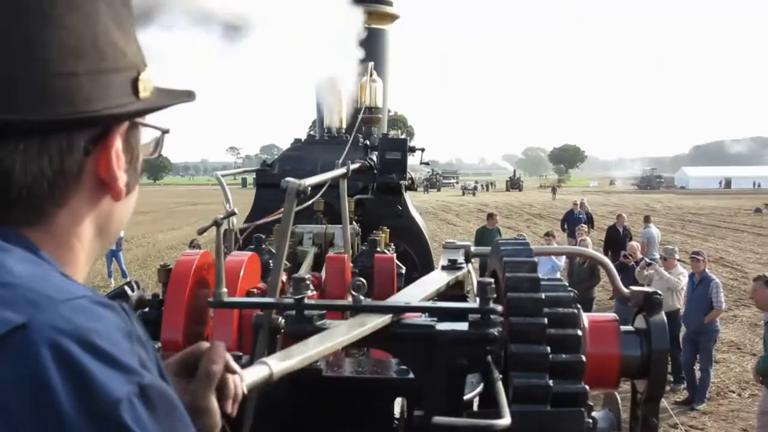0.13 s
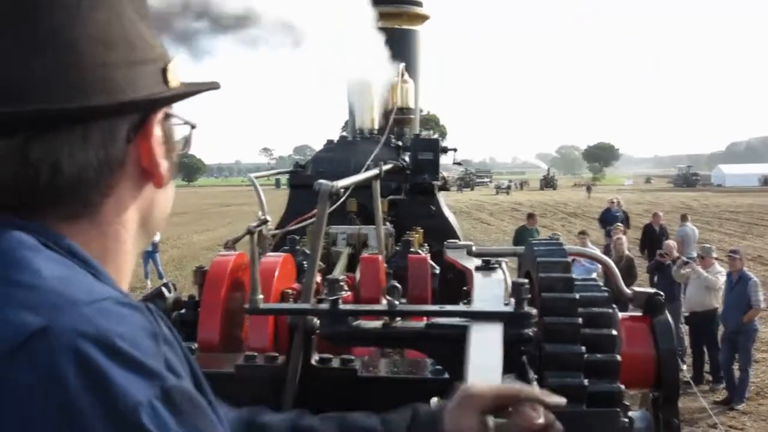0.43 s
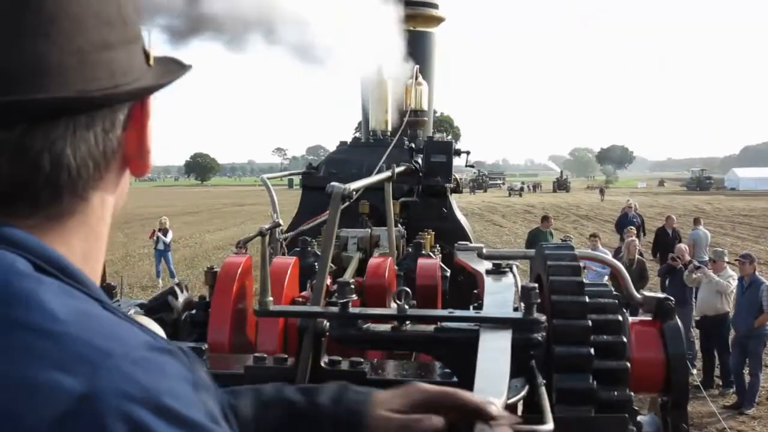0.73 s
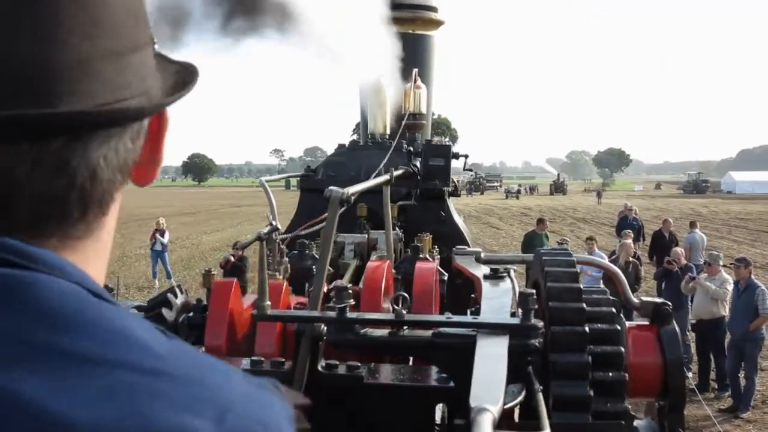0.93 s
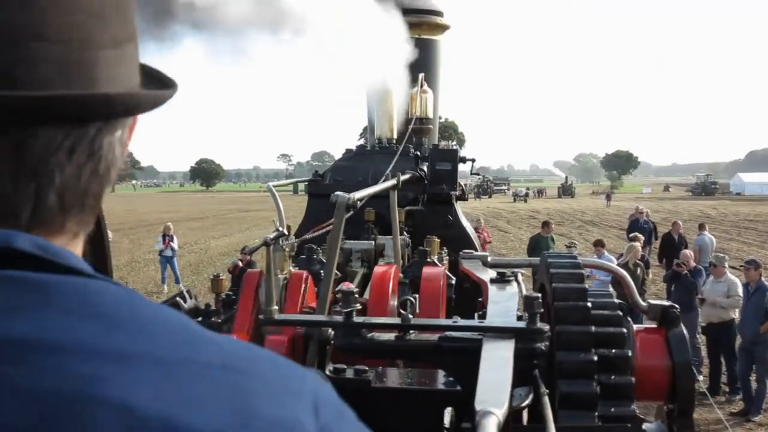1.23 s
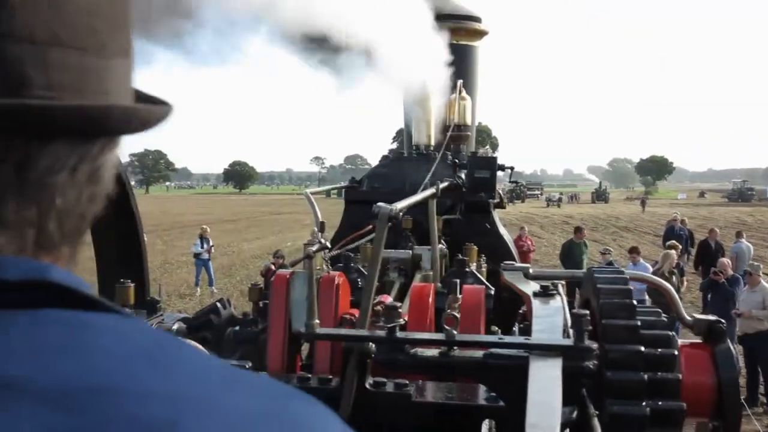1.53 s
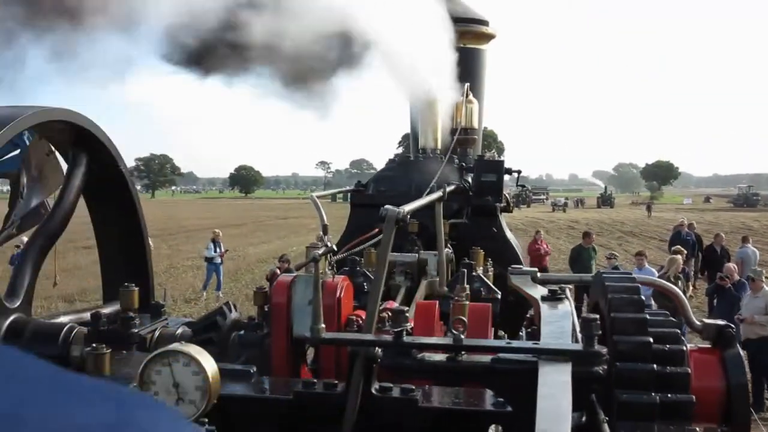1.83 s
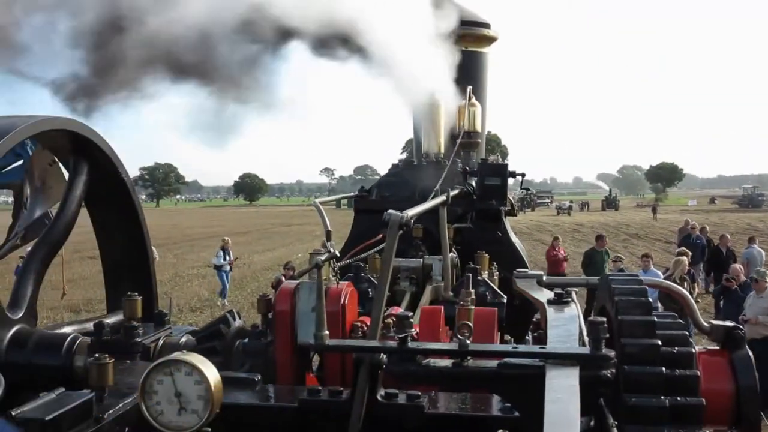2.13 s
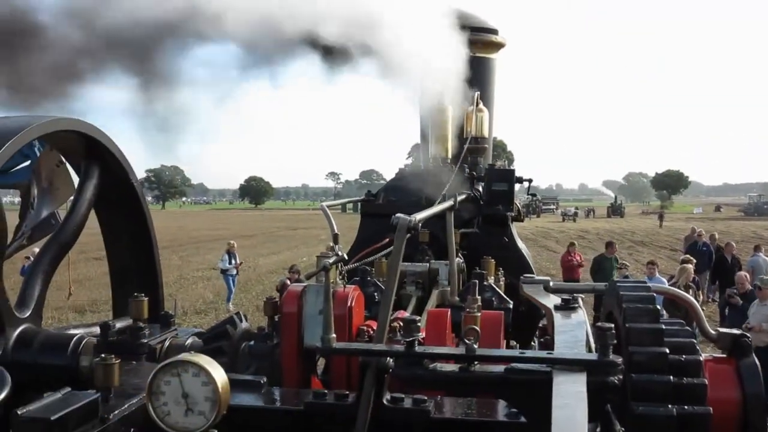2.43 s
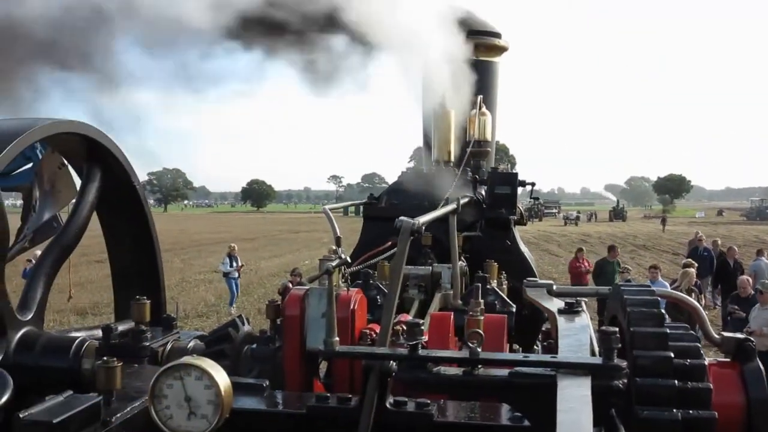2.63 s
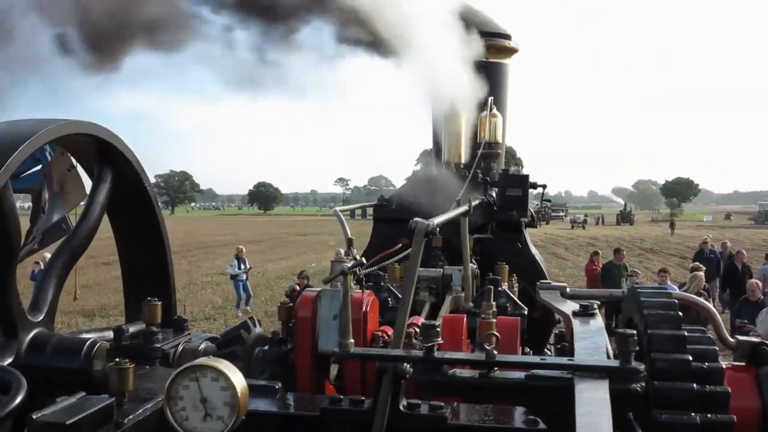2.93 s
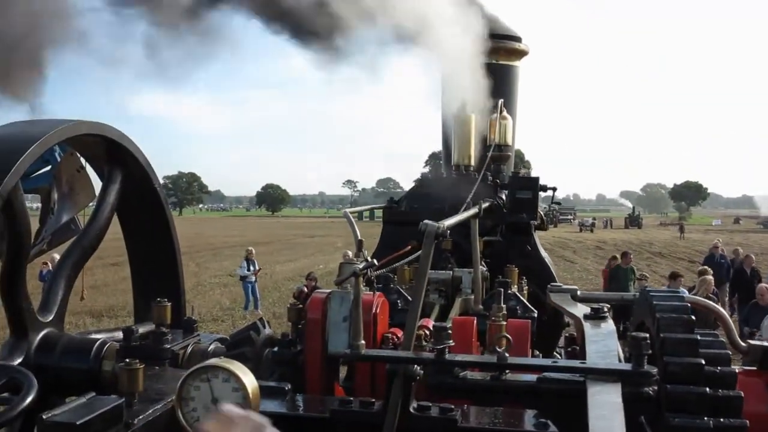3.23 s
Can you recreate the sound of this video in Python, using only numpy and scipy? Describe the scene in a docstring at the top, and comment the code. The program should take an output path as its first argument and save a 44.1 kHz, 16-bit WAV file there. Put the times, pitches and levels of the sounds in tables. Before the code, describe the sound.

Steam hisses steadily from a steam engine while a steel lever clanks and clicks.

```python
"""In a field, a steam engine blows off through its safety valve: a bright jet hiss, combed by echoes off
nearby metal that shift as the hand-held microphone turns. One narrow peak of the hiss glides down.
A long steel lever clanks and rattles and a catch clicks, each blow a crack plus ringing modes.
The boiler rumbles underneath; wind buffets the microphone, popping mostly on the right port."""
import sys
import numpy as np
from scipy import signal
from scipy.fft import rfft, irfft, next_fast_len
from scipy.io import wavfile
from scipy.ndimage import uniform_filter1d, map_coordinates

SR = 44100
rng = np.random.default_rng(int(sys.argv[2]) if len(sys.argv) > 2 else 0)


def dump(signal):
    """Clip the signal to [-1, 1] and save it as 16-bit WAV at the path in sys.argv[1]."""
    limited = np.clip(np.atleast_2d(signal).T, -1, 1)
    pcm = np.round(limited * 32767).astype(np.int16)
    wavfile.write(sys.argv[1], SR, pcm)


N = 149499

# Jet spectrum: freq_hz, left_db, right_db
JET_SPECTRUM = [(1350, -24.5, -23), (1980, -20, -20.5), (3150, -16, -16), (3930, -16.5, -15),
                (5340, -10.5, -8.5), (6950, -10.5, -2.5), (7700, -11.5, -2), (8060, -10, -3),
                (9330, -5, -9.5), (10640, -5.5, -19.5), (11660, -8, -18.5), (13300, -20, -32),
                (14100, -21, -29.5)]
# Narrow peaks and hollows: centre_hz, width_hz, left_db, right_db
JET_PEAKS = [(1510, 91, -8, -13), (1825, 170, 1, 2), (2280, 47, -4, -3), (3900, 51, -2, -1),
             (4760, 44, 0, -6), (5290, 50, -2, -4), (4900, 120, 0.5, 2.5), (6390, 130, 2, 3),
             (7266, 130, 1, 3.5), (11030, 190, 2.5, 0)]
# Phase between ports: freq_hz, left_lead_rad
JET_PHASE = [(5500, 0.019), (7000, 0.41), (8500, 1.86), (10000, 1.86), (11300, 0.4), (14000, -0.69)]
# Likeness between ports: freq_hz, coherence
JET_COHERENCE = [(1300, 0.92), (1800, 0.95), (2600, 1), (3900, 1), (5200, 0.87), (7000, 0.77),
                 (10000, 0.74), (13500, 0.19)]
# Relative hiss level as heard, ducking after the clank and the click: time_s, level_db, dull_band_db
HEARD_HISS_LEVEL = [(0, -29.5, 3.5), (.2, -28, 0), (.45, -27, 0.5), (.58, -26, 0.5), (.625, -33, 2),
                    (.8, -30.5, -1), (.99, -31.5, 1), (1.015, -39.5, 2), (1.09, -35, -1.5), (1.17, -36, -1),
                    (1.26, -30.5, -2), (1.37, -30, -4), (1.47, -31, -2), (1.7, -30.5, 0), (1.95, -31, 0.5),
                    (2.15, -29, -0.5), (2.42, -28, -1), (2.56, -29.5, 1), (2.8, -28, 2), (2.93, -29, 3.5),
                    (3.16, -27, 1), (3.21, -25.5, 1), (3.39, -24.5, 1.5)]


def steam_hiss():
    """Turbulent jet from the safety valve, combed by echoes, flickering in level."""
    def spread(hz):
        angle_rad = np.arccos(np.clip(spectrum(JET_COHERENCE, hz), -1, 1)) / 2
        return np.array([np.cos(angle_rad), np.sin(angle_rad)])

    def colour(hz):
        peaks_db = sum(np.outer(db, np.exp(-((hz - centre_hz) / width_hz) ** 2))
                       for centre_hz, width_hz, *db in JET_PEAKS)
        phase = np.exp(.5j * np.outer([1, -1], spectrum(JET_PHASE, hz)))
        return amp(spectrum(JET_SPECTRUM, hz) + peaks_db) * phase * highpass(hz, 900, 4)

    level_db, dull_band_db = curves(HEARD_HISS_LEVEL)
    mid, side = filtered(patchy_noise(depth_db=0.94), spread)
    left, right = filtered(np.array([mid + side, mid - side]), colour)
    jet = unit(np.array([metal_echoes(left, ECHO_DELAYS_LEFT, ECHO_GAINS_LEFT),
                         metal_echoes(right, ECHO_DELAYS_RIGHT, ECHO_GAINS_RIGHT)]))
    dull = filtered(jet, lambda hz: lowpass(hz, 4200, 4))
    flicker_db = .25 * wobble(12) + .6 * wobble(45)
    return amp(level_db + 1.5 + flicker_db) * (jet - dull + amp(dull_band_db) * dull)


# Seven echo paths per port: time_s, delay_ms of each path
ECHO_DELAYS_LEFT = [(0.28, 0.584, 1.013, 1.1, 1.19, 1.277, 1.378, 1.49),
                    (0.8, 0.54, 1.018, 1.2, 1.193, 1.275, 1.382, 1.489),
                    (1.15, 0.585, 1.025, 1.1, 1.199, 1.272, 1.5, 1.55),
                    (1.5, 0.61, 1.034, 1.07, 1.208, 1.268, 1.5, 1.478),
                    (1.85, 0.579, 0.96, 1.2, 1.214, 1.4, 1.364, 1.4),
                    (2.2, 0.59, 1.021, 1.13, 1.206, 1.288, 1.3, 1.46),
                    (2.6, 0.58, 1.022, 1.14, 1.19, 1.289, 1.374, 1.508),
                    (2.95, 0.569, 1.04, 1.12, 1.187, 1.286, 1.362, 1.44),
                    (3.25, 0.565, 1.043, 1.1, 1.185, 1.34, 1.345, 1.5)]
ECHO_DELAYS_RIGHT = [(0.28, 0.498, 0.845, 0.986, 1.2, 1.186, 1.272, 1.479),
                     (0.8, 0.51, 0.84, 0.975, 1.1, 1.21, 1.278, 1.486),
                     (1.15, 0.49, 0.82, 0.97, 1.131, 1.22, 1.28, 1.54),
                     (1.5, 0.51, 0.851, 0.965, 1.122, 1.23, 1.274, 1.481),
                     (1.85, 0.57, 0.78, 0.995, 1.136, 1.21, 1.23, 1.474),
                     (2.2, 0.53, 0.9, 1.014, 1.12, 1.215, 1.24, 1.495),
                     (2.6, 0.517, 0.829, 0.98, 1.1, 1.21, 1.303, 1.48),
                     (2.95, 0.53, 0.77, 0.992, 1.1, 1.21, 1.308, 1.43),
                     (3.25, 0.515, 0.76, 1.004, 1.2, 1.204, 1.307, 1.487)]
# Strength of the same paths: time_s, signed_gain of each path
ECHO_GAINS_LEFT = [(0.28, 0.03, -0.13, -0.037, 0.41, -0.13, 0.12, -0.15),
                   (0.8, -0.086, -0.047, -0.04, 0.32, -0.15, 0.2, -0.16),
                   (1.15, -0.007, 0.09, 0.067, 0.35, -0.2, 0.066, -0.064),
                   (1.5, -0.037, -0.055, -0.11, 0.07, 0.23, -0.06, 0.1),
                   (1.85, -0.047, -0.1, -0.22, 0.088, -0.17, -0.15, -0.14),
                   (2.2, -0.1, 0.022, 0.29, 0.26, -0.12, 0.079, -0.17),
                   (2.6, -0.13, 0.34, 0.22, 0.14, -0.18, 0.1, -0.25),
                   (2.95, -0.13, 0.32, 0.19, 0.5, -0.1, 0.03, -0.2),
                   (3.25, -0.064, 0.36, -0.07, 0.33, -0.19, -0.082, -0.19)]
ECHO_GAINS_RIGHT = [(0.28, -0.11, 0.39, 0.23, 0.083, 0.27, -0.22, -0.12),
                    (0.8, -0.13, 0.13, 0.012, 0.035, 0.14, -0.29, -0.27),
                    (1.15, -0.15, 0.16, -0.15, -0.15, 0.26, -0.33, -0.11),
                    (1.5, -0.13, 0.0, -0.25, -0.2, 0.062, 0.34, 0.16),
                    (1.85, 0.047, 0.11, -0.28, -0.16, 0.069, -0.051, 0.14),
                    (2.2, -0.18, 0, -0.16, 0.088, 0.13, -0.08, -0.092),
                    (2.6, -0.26, 0.01, 0.18, 0.19, 0.14, -0.35, -0.065),
                    (2.95, -0.2, 0.1, 0.28, 0.098, 0.15, -0.23, -0.17),
                    (3.25, -0.098, 0.034, 0.24, 0.24, 0.25, -0.12, -0.081)]


def metal_echoes(direct, delays_ms, gains):
    """Direct sound plus reflections off nearby metal, drifting as the microphone turns."""
    read_at = np.arange(N) - np.array(curves(delays_ms)) * SR / 1000
    return direct + np.sum(curves(gains) * map_coordinates(direct, [read_at], order=5), axis=0)


# Gliding peak of the hiss, relative level: time_s, pitch_hz, level_db
WHISTLE_GLIDE = [(1.3, 7580, -60), (1.75, 7500, -42), (2.0, 7290, -38), (2.3, 7310, -38), (2.75, 7340, -38),
                 (3.05, 7300, -39), (3.39, 7350, -50)]


def steam_whistle(width_hz=140, left_lead_rad=1):
    """A narrow band of hiss on a gliding centre."""
    pitch_hz, level_db = curves(WHISTLE_GLIDE)
    a, b = filtered(rng.standard_normal((2, N)), lambda hz: lowpass(hz, width_hz, 2))
    phase = 2 * np.pi * np.cumsum(pitch_hz) / SR + np.array([[left_lead_rad], [0]])
    return amp(level_db) * pan_db(-3, 2) * unit(a * np.cos(phase) + b * np.sin(phase))


# Lever blows, relative levels: start_s, level_db, ring_db
LEVER_BLOWS = [(.02, -15.5, -3), (.249, -29, 1), (.299, -30, 4), (.5878, -16, -31), (.5912, -11, -9),
               (.595, -14, -2.5), (.608, -24, -3), (.621, -35, 1), (.627, -29, 10.5), (.64, -38, 3),
               (.655, -27.5, 3.5)]
# Lever modes: pitch_hz, level_db, t60_s
LEVER_MODES = [(582, -18, 1.2), (596, -24, .2), (721, -9, .15), (764, -4, .11), (805, 0, .06),
               (894, -11, .36), (1017, -5, .24), (1045, -5, .12), (1400, -8, .06), (1723, -11, .06),
               (2280, -9, .05), (2800, -9, .04), (3600, -9, .03), (4050, -6, .03)]


def lever():
    """A long steel lever rings as it clanks and rattles."""
    clanks = struck(LEVER_BLOWS, LEVER_MODES, crack_db=4, crack_t60_s=0.05, crack_hz=[1200, 5200])
    return amp(-13.5) * pan_db(-.7, .7) * clanks


# Catch impacts, relative level: start_s, level_db
CATCH_BLOWS = [(0.9925, -13), (0.9952, -7), (0.997, -13), (1.001, -15), (1.011, -25)]
# Catch modes: pitch_hz, level_db, t60_s
CATCH_MODES = [(440, -19, 0.092), (474, -21, 0.09), (1080, -30, 0.08), (1510, -15, 0.076), (1540, -26, 0.1),
               (1703, -13, 0.083), (2980, -20, 0.044), (3600, -20, .04), (4530, -4.5, 0.029),
               (5190, -1, 0.021), (5430, 0, 0.024), (6200, -5, 0.029), (6670, 5, 0.022), (7140, 6.5, 0.011),
               (9500, -22, .02)]


def catch():
    """The catch snaps and bounces with a short, bright ring."""
    blows = [(start_s, level_db, 0) for start_s, level_db in CATCH_BLOWS]
    clicks = struck(blows, CATCH_MODES, crack_db=-9, crack_t60_s=0.14, crack_hz=[200, 7950])
    return amp(-15.5) * pan_db(-3, 2.2) * clicks


def struck(blows, modes, crack_db, crack_t60_s, crack_hz, damped_after_s=.225):
    """Struck metal: each blow makes a noise crack and rings the modes anew."""
    out, t = np.zeros(N + SR), np.arange(SR // 2) / SR
    crack_band = signal.butter(2, crack_hz, 'bandpass', fs=SR)
    for start_s, level_db, ring_db in blows:
        ring = sum(amp(db + rng.normal(0, 1) - 60 * t / t60_s)
                   * np.sin(2 * np.pi * (hz * t + rng.random())) for hz, db, t60_s in modes)
        ring *= amp(ring_db) / (1 + (t / damped_after_s) ** 10)
        crack = unit(signal.lfilter(*crack_band, rng.standard_normal(len(t))))
        crack *= amp(crack_db - 60 * t / crack_t60_s)
        out[round(start_s * SR):][:len(t)] += amp(level_db) * (ring + crack)
    return out[:N]


# Boiler and exhaust spectrum: freq_hz, level_db
BOILER_SPECTRUM = [(18, -56), (30, -22), (76, -4), (123, -20.5), (641, -26.5), (685, -22), (1070, -13),
                   (1600, -15), (2080, -32), (3520, -120)]


def boiler(below_hiss_db=25.5):
    """Boiler and exhaust rumble, following the heard level of the hiss."""
    level_db, _ = curves(HEARD_HISS_LEVEL)
    mid, side = filtered(patchy_noise(depth_db=3),
                         lambda hz: amp(spectrum(BOILER_SPECTRUM, hz)) * lowpass(hz, 1600, 6))
    rumble = unit(np.array([mid + 0.2 * side, mid - 0.18 * side]))
    return amp(level_db + 1.5 - below_hiss_db) * rumble


# Gusts, relative levels: time_s, buffet_db, flutter_db
WIND_ENVELOPE = [(0.0, -30.5, -36), (0.07, -31, -41), (0.16, -38.5, -48), (0.2, -36, -44.5),
                 (0.32, -37.5, -51), (0.41, -50, -55), (0.54, -38, -41), (0.65, -41, -42.5),
                 (0.76, -49.5, -62.5), (1.01, -56, -61), (1.17, -41, -52), (1.37, -56, -61),
                 (1.52, -57, -69), (1.56, -66, -67), (1.68, -41, -62), (1.81, -73, -57.5), (1.84, -47, -55),
                 (1.89, -71, -68), (1.93, -43, -56), (1.96, -59, -65), (2.0, -37, -47), (2.03, -45.5, -51),
                 (2.2, -44, -53.5), (2.27, -44.5, -45.5), (2.38, -53, -63), (2.52, -39, -50),
                 (2.57, -53, -57), (2.61, -37.5, -43), (2.79, -57, -62), (2.83, -46, -55),
                 (3.23, -43, -49.5), (3.39, -58, -56)]
# Wind pops on the right port: time_s, peak_db, pitch_hz
WIND_POPS = [(0.001, -26, 337), (0.009, -19, 520), (0.024, -20, 406), (0.038, -13, 930), (0.046, -22, 490),
             (0.055, -17.5, 700), (0.074, -26, 710), (0.094, -21.5, 673), (0.178, -25, 606),
             (0.189, -26.0, 580), (0.211, -25, 283), (0.248, -24, 660), (0.256, -22, 666),
             (0.261, -23, 526), (0.299, -28, 740), (0.373, -27, 467), (0.445, -27, 770), (0.477, -26, 800),
             (0.501, -19.5, 650), (0.51, -29, 363), (0.517, -17, 566), (0.531, -15.0, 680),
             (0.55, -15.5, 750), (0.567, -26, 533), (1.079, -32.5, 262), (1.112, -29.5, 570),
             (1.186, -28.5, 650), (1.249, -32.5, 470), (1.264, -24.5, 800), (1.276, -32.5, 505),
             (1.655, -37, 730), (1.767, -33, 377), (2.004, -35, 600), (2.014, -28, 500), (2.058, -32, 940),
             (2.086, -25.5, 630), (2.119, -27, 604), (2.126, -36, 440), (2.139, -28, 680),
             (2.161, -25, 870), (2.211, -26.5, 540), (2.226, -24.5, 730), (2.255, -31, 700),
             (2.273, -33, 450), (2.287, -31, 696), (2.307, -30, 570), (2.346, -30.5, 580), (2.49, -38, 226),
             (2.506, -36, 330), (2.571, -27.5, 494), (2.609, -22, 557), (2.617, -37, 493),
             (2.627, -27, 550), (2.639, -24.5, 430), (2.651, -21, 740), (2.657, -17, 770),
             (2.693, -30.5, 454), (2.751, -28.5, 616), (2.771, -28, 860), (2.836, -28, 517),
             (2.912, -24, 663), (3.008, -26, 352), (3.057, -22, 680), (3.067, -18.5, 720),
             (3.075, -21.5, 570), (3.086, -19.5, 760), (3.093, -29, 580), (3.205, -19, 590),
             (3.219, -28, 760), (3.249, -22, 800)]
# Buffeting spectrum: freq_hz, level_db
BUFFET_SPECTRUM = [(15, -48), (30, -17), (59, -4), (81, -3), (134, -2.5), (371, -15), (450, -12),
                   (580, -23), (990, -120)]


def wind_buffet(thump_hz=148.7):
    """Low lumps of wind shake both ports together, with a thump under each pop."""
    buffet_db, _ = curves(WIND_ENVELOPE)
    time_s, peak_db, _ = np.transpose(WIND_POPS)
    lumps = amp(2 * wobble(18) + 2.5 * wobble(50)) * rng.standard_normal((2, N))
    mid, side = filtered(lumps, lambda hz: amp(spectrum(BUFFET_SPECTRUM, hz)) * lowpass(hz, 450, 6))
    buffet = amp(buffet_db - 1.5) * unit(mid + 0.13 * np.array([side, -side]))
    thumps = wavelets(time_s, peak_db - 10.5, np.full(len(time_s), thump_hz), width_cycles=0.59)
    return (buffet + thumps) * pan_db(-.9, .9)


# Port flutter spectrum: freq_hz, level_db
FLUTTER_SPECTRUM = [(60, -34), (200, 9.5), (500, 11), (850, 10), (1200, 5.5), (1600, -4), (2500, -32)]
# Leak from right port to left: freq_hz, gain_db, phase_rad
PORT_LEAK = [(150, -0.5, 0.44), (292, -4.5, 0.61), (447, -11, 0.73), (674, -16, 2.7), (940, -25, 1.85),
             (1300, -13.5, 0.36)]


def wind_flutter(pop_cycles=0.56):
    """Wind flutters and pops on the ports, mostly the right, which leaks to the left."""
    def leak(hz):
        gain_db, phase_rad = spectrum(PORT_LEAK, hz)
        return amp(gain_db) * np.exp(1j * phase_rad)

    _, flutter_db = curves(WIND_ENVELOPE)
    time_s, peak_db, pitch_hz = np.transpose(WIND_POPS)
    ragged = amp(1.46 * wobble(25.08) + 4.4 * wobble(110)) * rng.standard_normal((2, N))
    flutter = unit(filtered(ragged, lambda hz: amp(spectrum(FLUTTER_SPECTRUM, hz))))
    left, right = amp(flutter_db + 6) * flutter
    right += wavelets(time_s, peak_db, pitch_hz, pop_cycles)
    left += wavelets(time_s, peak_db - 7, pitch_hz, pop_cycles)
    left = amp(-3.5) * filtered(left, lambda hz: highpass(hz, 380, 4))
    return np.array([left + filtered(right, leak), right])


def wavelets(time_s, peak_db, pitch_hz, width_cycles):
    """One Gaussian tone burst of random phase per event."""
    pad = 1000
    offsets = np.arange(-pad, pad)
    cycles = np.outer(pitch_hz, offsets / SR)
    envelopes = amp(peak_db)[:, None] * np.exp(-(cycles / width_cycles) ** 2)
    waves = envelopes * np.cos(2 * np.pi * (cycles + rng.random((len(time_s), 1))))
    at = np.round(time_s * SR).astype(int)[:, None] + offsets + pad
    return np.bincount(at.ravel(), waves.ravel(), N + 2 * pad)[pad:N + pad]


def patchy_noise(depth_db):
    """Two white noises sharing time-frequency patches of random gain."""
    bins = signal.stft(rng.standard_normal((2, N)), nperseg=512)[2]
    patches = uniform_filter1d(rng.standard_normal(bins.shape[1:]), size=6, axis=0)
    patches = uniform_filter1d(patches, size=10, axis=1)
    return signal.istft(bins * amp(depth_db * unit(patches)), nperseg=512)[1][:, :N]


def wobble(rate_hz):
    """Smooth random curve."""
    knots = rng.standard_normal(int(N * 200 / SR) + 4)
    return map_coordinates(knots, [np.arange(N) * rate_hz / SR])


def spectrum(rows, hz):
    """Table columns interpolated over log frequency."""
    freq_hz, *columns = np.transpose(rows)
    return np.squeeze([np.interp(np.log(hz + 1), np.log(freq_hz + 1), c) for c in columns])


def curves(rows):
    """Table columns interpolated over time, per sample."""
    time_s, *columns = np.transpose(rows)
    return [np.interp(np.arange(N) / SR, time_s, c) for c in columns]


def filtered(x, response):
    """x through a complex frequency response."""
    size = next_fast_len(N + SR // 4)
    return irfft(rfft(x, size) * response(np.fft.rfftfreq(size, 1 / SR)), size)[..., :N]


def lowpass(hz, corner_hz, order):
    return 1 / (1 + (hz / corner_hz) ** order)


def highpass(hz, corner_hz, order):
    return 1 - lowpass(hz, corner_hz, order)


def amp(db):
    return 10 ** (np.asarray(db) / 20)


def pan_db(left_db, right_db):
    return amp([[left_db], [right_db]])


def unit(x):
    return x / np.sqrt(np.mean(x ** 2) + 1e-20)


def scene():
    """Metalwork, engine and wind in stereo."""
    metalwork = lever() + catch()
    engine = steam_hiss() + boiler() + steam_whistle()
    return metalwork + engine + wind_buffet() + wind_flutter()


def record(dry, low_cut_hz=36, top_hz=14250):
    """The microphone trims the deep bass and passes nothing above its band limit."""
    return filtered(dry, lambda hz: (hz < top_hz) / (1 - 1j * low_cut_hz / (hz + 1)) ** 2)


dry = scene()
out = record(dry)
dump(out)
```